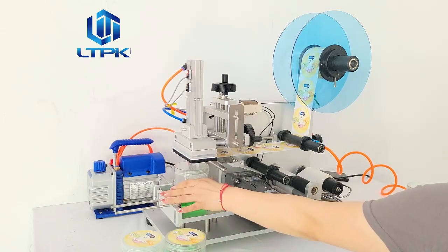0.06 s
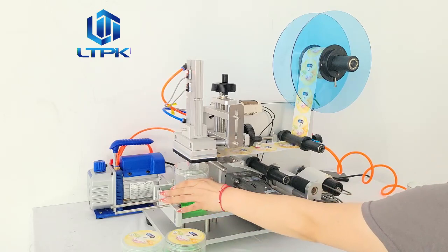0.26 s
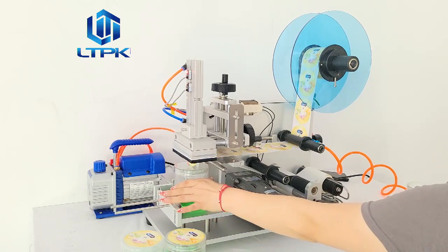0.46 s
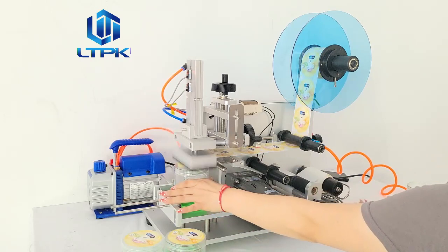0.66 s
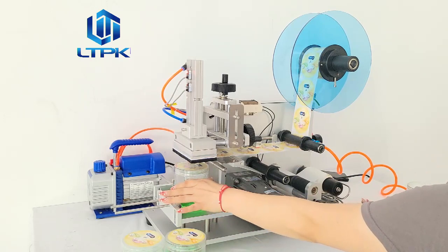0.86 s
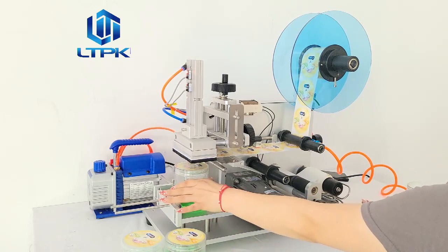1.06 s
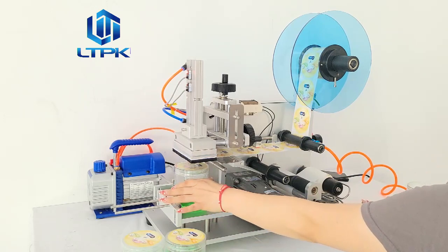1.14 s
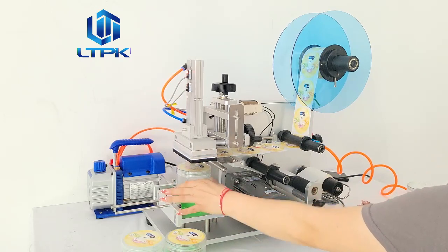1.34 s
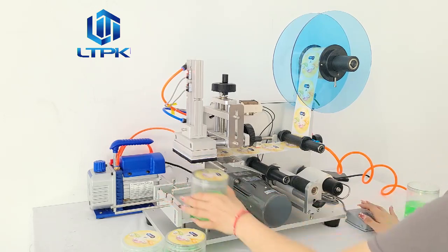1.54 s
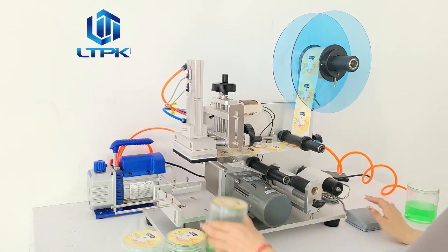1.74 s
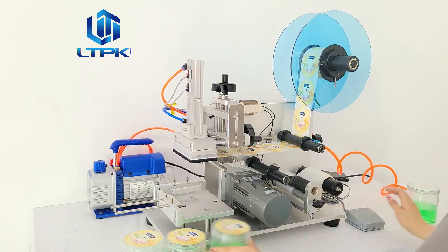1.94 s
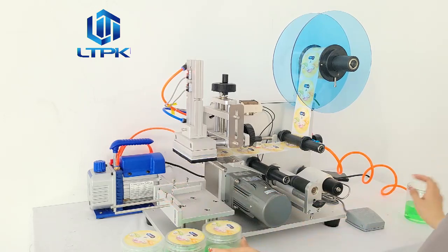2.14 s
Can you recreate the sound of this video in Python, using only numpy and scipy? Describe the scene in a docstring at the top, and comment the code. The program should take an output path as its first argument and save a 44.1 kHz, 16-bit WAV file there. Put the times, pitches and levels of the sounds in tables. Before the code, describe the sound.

An air-powered labeling machine hisses loudly, then clacks, before a jar knocks on a table.

```python
"""An air-powered labeller runs one cycle on a table in a small bare room.
A switch blips, the valve snaps over and air hisses as the cylinder presses a label onto a jar.
The valve snaps back, the cylinder empties and the piston clacks into its top stop, ringing the frame.
The jar rubs softly as it slides off its seat, then knocks and rocks as it is set on the table.
All the while a small vacuum pump puffs away."""
import sys
import numpy as np
from scipy import signal
from scipy.fft import rfft, irfft
from scipy.io import wavfile
from scipy.ndimage import uniform_filter1d

SR = 44100
rng = np.random.default_rng(int(sys.argv[2]) if len(sys.argv) > 2 else 0)


def put_to_file(sound):
    """Save the sound as 16-bit audio at rate SR, in the file named by the first command-line argument."""
    columns = np.atleast_2d(sound).T  # one column per channel
    safe = np.clip(columns, -1, 1)
    whole_steps = np.round(safe * 32767)
    wavfile.write(sys.argv[1], SR, whole_steps.astype(np.int16))


N = 97020
T = np.arange(N) / SR


def from_db(db):
    """Turn decibels into a number to multiply by."""
    return 10 ** (np.asarray(db) / 20)


def rms_one(x):
    """Scale a sound so that its average strength (rms) is 1."""
    return x / np.sqrt(np.mean(x ** 2) + 1e-20)


def cut(x, hz, kind, order=2):
    """Keep the "low" or the "high" side of hz; a higher order cuts more sharply."""
    return signal.sosfilt(signal.butter(order, hz, kind, fs=SR, output="sos"), x + 1e-18)


def colour(x, points):
    """Make some pitches louder and others softer, following (f/Hz, level/dB) points."""
    hz, db = np.transpose(points)
    f = np.maximum(np.fft.rfftfreq(N, 1 / SR), 1)
    return irfft(rfft(x) * from_db(np.interp(np.log(f), np.log(hz), db)), N)


def noise(points):
    """Steady noise of strength 1 with the given tone colour."""
    return rms_one(colour(rng.standard_normal(N), points))


def burst(start, decay):
    """A level that jumps to 1 at the start time and dies away."""
    return (T >= start) * np.exp(-np.maximum(T - start, 0) / decay)


def ring(drive, hz, t60):
    """One ringing note: a click sets it off and it fades by 60 dB in its ring time, t60."""
    r, w = from_db(-60 / (t60 * SR)), 2 * np.pi * hz / SR
    return signal.lfilter([.5, 0, -.5], [1, -2 * r * np.cos(w), r * r], drive + 1e-18)


def clicks(times, db):
    """Single clicks at the given times and levels."""
    out = np.zeros(N)
    np.add.at(out, np.clip((times * SR).astype(int), 0, N - 1), from_db(db))
    return out


HUM_HZ, HUM_DB = 100, -62.5
# tone colour of the pump's hiss: f/Hz, level/dB
PUMP_COLOUR = [(60, -35.5), (300, -27), (780, -15.5), (1100, -14.5), (1800, -10.5), (2130, -8.5),
               (2850, -5), (3300, -14), (6000, -19), (9000, -13.5), (11500, -6), (13300, 4), (15500, -0.5)]
# a noise suppressor's gain on the steady pump hiss, lower in the quiet stretch: t/s, level/dB
SUPPRESSOR_GAIN = [(0, -46.5), (.21, -43), (1.0, -47), (1.33, -55), (1.47, -57), (2.035, -57.5),
                   (2.05, -47.5), (2.2, -47)]
# how the hum rises and falls around HUM_DB: t/s, level/dB
HUM_LOUDNESS = [(0, -17), (.12, -20.5), (.17, -28), (.3, -8), (1.08, 6.5), (1.2, -34.5), (2.2, -37)]

def pump(turn_s=.04192, first_s=.0318, puff_db=9, weak_db=-4.5, spread_db=1.2, split_hz=11000):
    """Each turn gives a strong and a weak puff that ring the housing, over a leak and the motor's hum."""
    count = np.arange(-1, int(2 * N / SR / turn_s))
    times = first_s + count * turn_s / 2
    db = puff_db + weak_db * (count % 2) + spread_db * rng.standard_normal(len(count))
    echoes = clicks(times + .012, db - 16)  # a small one follows each puff
    shape = burst(0, decay=.0048) * (1 - burst(0, decay=.0005))  # quick rise, slower fall
    puffs = signal.fftconvolve(clicks(times, db) + echoes, shape / shape.max())[:N]
    # the puffs stand out above split_hz; below it the steady leak counts for more
    bright_leak, dull_leak = from_db(-7), from_db(-0.5)
    bright = np.hypot(puffs, bright_leak) * cut(noise(PUMP_COLOUR), split_hz, "high", order=4)
    dull = np.hypot(from_db(-4.5) * puffs, dull_leak) * cut(noise(PUMP_COLOUR), split_hz, "low", order=4)
    taps = clicks(times + .002, db=-5 + spread_db * rng.standard_normal(len(times)))
    housing = ring(taps, hz=2110, t60=0.031)
    hum_level = from_db(HUM_DB + np.interp(T, *np.transpose(HUM_LOUDNESS)))
    hum = hum_level * np.sin(2 * np.pi * HUM_HZ * T)
    suppressor = from_db(np.interp(T, *np.transpose(SUPPRESSOR_GAIN)))
    return suppressor * (bright + dull + housing) + hum


# clicks of the switch and the opening valve: t/s, level/dB
VALVE_CLICKS = [(.143, -49.5), (.153, -45), (0.226, -39.5), (0.239, -28)]
# notes of the valve body: f/Hz, level/dB, ring time/s
VALVE_NOTES = [(960, -3.5, 0.21), (1044, 8.5, 0.087), (1050, -24, 0.15)]
# first spits of air through the valve: t/s, level/dB, decay/s
AIR_SPITS = [(.2265, -21, 0.019), (.2364, -12.5, 0.0073), (.249, -20.5, 0.011)]
# tone colour of the spits: f/Hz, level/dB
SPIT_COLOUR = [(2500, -13.5), (4400, -21.5), (5100, 0.5), (5900, -9), (7300, -5.5), (8500, -5.5),
               (10000, 3), (11200, 2.5), (12500, -5.5), (14700, 6), (16000, -10)]

def valve():
    """Clicks set the valve body ringing near 1 kHz, and the first air spits through the gap."""
    times, db = np.transpose(VALVE_CLICKS)
    body = sum(ring(clicks(times, db + level), hz, t60) for hz, level, t60 in VALVE_NOTES)
    spit_level = sum(from_db(level) * burst(start, decay) for start, level, decay in AIR_SPITS)
    spits = spit_level * noise(SPIT_COLOUR)
    return cut(cut(body, 2000, "low") + spits, 800, "high", order=4)


AIR_ON_S, AIR_RISE_S, AIR_OFF_S, AIR_FALL_DB_PER_S, AIR_DB = 0.2295, 0.027, 0.8194, 601.5, -11
VENT_S, VENT_RISE_S, VENT_DB = .857, .012, -7.5
# tone colour of the rushing air: f/Hz, level/dB
AIR_COLOUR = [(24, -76), (40, -39), (96, -42.5), (214, -35), (693, -30.5), (805, -27), (1030, -21.5),
              (1230, -26), (1500, -17), (2140, -41.5), (3190, -24), (4640, -26), (6580, -20), (7280, -20),
              (12900, 3), (14700, 4.5), (15800, -26.5)]
# whistles of the exhaust port: f/Hz, width/Hz, level/dB
PORT_WHISTLES = [(13310, 150, -9.5), (14600, 660, -9)]
# faint left-right shimmer of audio coding, heard during the hiss: f/Hz, level against the hiss/dB
CODING_SHIMMER = [(3000, -51.5), (4500, -14.5), (7000, -7.5), (10000, -28), (12500, -38), (14000, -45)]

def air_hiss(split_hz=8500, wash_rise_s=0.16, flutter_db=.5, flutter_hz=25):
    """Air jets through the open valve, then the cylinder empties in a puff. Returns hiss and shimmer."""
    opening = np.clip((T - AIR_ON_S) / AIR_RISE_S, 0, 1)
    flow = opening * from_db(AIR_DB - AIR_FALL_DB_PER_S * np.maximum(T - AIR_OFF_S, 0))
    vent = from_db(VENT_DB) * np.clip((T - VENT_S) / VENT_RISE_S, 0, 1) * burst(VENT_S, decay=0.013)
    flutter = rms_one(cut(rng.standard_normal(N), flutter_hz, "low"))
    level = (flow + vent) * from_db(flutter_db * flutter)
    # the lower wash builds more slowly than the bright jet
    swell = np.clip((T - AIR_ON_S) / wash_rise_s, 0, 1)
    wash = swell * cut(noise(AIR_COLOUR), split_hz, "low", order=6)
    whistles = sum(from_db(db) * rms_one(ring(rng.standard_normal(N), hz, np.log(1000) / (np.pi * width)))
                   for hz, width, db in PORT_WHISTLES)
    jet = cut(noise(AIR_COLOUR) + whistles, split_hz, "high", order=6)
    return level * (jet + wash), level * colour(noise(AIR_COLOUR), CODING_SHIMMER)


# blows on the machine: t/s, thud level/dB, frame level/dB, crack level/dB, decay/s, rise/s
MACHINE_BLOWS = [(0.246, -61, -24, -46.5, 0.0036, 0.00095), (0.2522, -65, -16, -34.5, 0.004, 0.00057),
                 (0.262, -62, -21.5, -53, 0.0031, 0.00036), (0.769, -34, -40, -60.5, 0.03, .008),
                 (0.787, -40, -33, -51.5, 0.075, 0.0015), (0.857, -43, -19.5, -20.5, 0.017, 0.0014),
                 (0.8754, -31, -16, -39.5, 0.0021, 0.0019), (0.88, -20.5, -16, -21, 0.0077, 0.0011),
                 (0.969, -23, -21.5, -8, 0.0029, 0.00055), (0.975, -25.5, -29.5, -32, .024, 0.0037),
                 (1.019, -52, -33, -48, 0.0028, 0.00024)]
# notes of the steel frame: f/Hz, level/dB, ring time/s
FRAME_NOTES = [(712.3, -12.5, 0.18), (988, -6.5, 0.07), (1280, -0.5, 0.079), (1388, -3.5, 0.11),
               (1525, 3, 0.014), (1705, 3.5, 0.049), (1899, -5, 0.041), (2187, -15, 0.04),
               (2966, -15.5, .04)]
# tone colour of a dull thud, also used for the jar's rubs and scuffs: f/Hz, level/dB
THUD_COLOUR = [(40, -34), (100, -9), (170, -8.5), (270, 4.5), (350, -5.5), (430, -3.5), (600, -2),
               (900, 0.5), (1500, -21.5), (3000, -28)]
# tone colour of a sharp metal crack: f/Hz, level/dB
CRACK_COLOUR = [(500, -19), (2400, -11.5), (3150, 8.5), (3700, -0.5), (4350, -0.5), (5000, -4.5), (6400, 1),
                (7800, -5.5), (9500, 3.5), (10500, -7.5), (12000, -7.5), (16000, -8.5)]

def machine_clacks():
    """Each blow is a short rattle made of a low thud, the ringing steel frame and a bright crack."""
    thud_level, rings, crack_level = 0, 0, 0
    for start, thud_db, frame_db, crack_db, decay, rise in MACHINE_BLOWS:
        rattle = burst(start, decay) * np.clip((T - start) / rise, 0, 1)
        frame = sum(from_db(db) * rms_one(ring(rattle * rng.standard_normal(N), hz, t60))
                    for hz, db, t60 in FRAME_NOTES)
        loudest = np.sqrt(uniform_filter1d(frame ** 2, size=256).max())
        rings += from_db(frame_db) * frame / loudest
        thud_level += from_db(thud_db) * rattle
        crack_level += from_db(crack_db) * rattle
    rings = cut(cut(rings, 700, "high", order=4), 3800, "low")
    thuds = cut(thud_level * noise(THUD_COLOUR), 130, "high")
    return thuds + rings + crack_level * noise(CRACK_COLOUR)


# rubs of the jar on its seat: t/s, half length/s, level/dB, friction compared with the note/dB
JAR_RUBS = [(1.681, .025, -64, -6), (1.788, .02, -60.5, -20)]

def jar_slide():
    """The jar slides off its seat: soft rubs swell and fade on its main note, with some friction noise."""
    note = ring(rng.standard_normal(N), hz=330, t60=0.11)
    hollow = rms_one(cut(note, 500, "low"))
    friction = cut(noise(THUD_COLOUR), 400, "high")
    return sum(from_db(db) * np.exp(-((T - middle) / half) ** 2) * (hollow + from_db(rough_db) * friction)
               for middle, half, db, rough_db in JAR_RUBS)


# bumps of the jar on the table: t/s, level/dB, extra for the upper notes and scuff/dB
JAR_BUMPS = [(2.0446, -33.5, -12), (2.0565, -28.5, -9), (2.0655, -26.5, -20), (2.0742, -39, 12),
             (2.0875, -31, 0), (2.098, -29.5, -2.5), (2.112, -40, -9), (2.126, -46, 8), (2.151, -40, 0),
             (2.173, -43, -1)]
# notes of the jar on the table top: f/Hz, level/dB, ring time/s
JAR_NOTES = [(101.5, -21, 0.42), (181, -16.5, 0.079), (280, -11, 0.11), (329.5, -0.5, 0.11),
             (382, -14, 0.087), (503.4, -12, 0.41), (599, -27, 0.27), (816, -13, 0.08)]

def jar_knocks(upper_hz=450, scuff_db=-11.5):
    """The jar knocks and rocks on its base; touches of the rim bring out its upper notes."""
    times, db, extra_db = np.transpose(JAR_BUMPS)
    rings = sum(ring(clicks(times, db + level + extra_db * (hz > upper_hz)), hz, t60)
                for hz, level, t60 in JAR_NOTES)
    scuff_level = sum(from_db(level + scuff_db) * burst(start, decay=0.0059)
                      for start, level in zip(times, db + extra_db))
    knocks = rings + scuff_level * noise(THUD_COLOUR)
    return cut(cut(knocks, 700, "low", order=4), 90, "high")


# echo of the small bare room: f/Hz, ring time/s, level/dB
ROOM_ECHO = [(101, 0.23, -0.5), (300, 0.53, -7), (806, .65, -8.5), (1520, 0.81, -11.5), (3200, .6, -8.5),
             (6000, 0.66, -8.5), (9140, 0.33, -6.5), (10900, .32, -20), (15000, 0.66, -20.5)]

def room(x, gap_s=0.0081):
    """The walls send back a blur of echoes; each band of pitch has its own level and ring time."""
    hz, t60, db = np.transpose(ROOM_ECHO)
    f, white, tail = np.fft.rfftfreq(N, 1 / SR), rfft(rng.standard_normal(N)), 0
    edges = np.geomspace(40, 18000, 15)
    for low, high in zip(edges, edges[1:]):
        length, level = (np.interp(np.log(low * high) / 2, np.log(hz), column) for column in (t60, db))
        band = irfft(white * (f >= low) * (f < high), N)
        fade = burst(gap_s, length / np.log(1000))
        tail += from_db(level) * band * fade / np.linalg.norm(fade)
    return signal.fftconvolve(x, tail)[:N]


def scene(air_echo_db=0.5, jar_echo_db=-1.5):
    """Add up the sounds in the centre; only the faint coding shimmer differs between left and right."""
    clacks = machine_clacks() + valve()
    knocks = jar_knocks()
    hiss, shimmer = air_hiss()
    echo = room(clacks + from_db(air_echo_db) * hiss + from_db(jar_echo_db) * knocks)
    centre = pump() + clacks + hiss + jar_slide() + knocks + echo
    return centre + shimmer * np.array([[1], [-1]])


def record(dry, ceiling=1.55, cutoff_hz=15750):
    """Round off the loudest peaks and remove the very highest treble."""
    rounded = ceiling * np.tanh(dry / ceiling)
    return signal.sosfilt(signal.ellip(12, .1, 90, cutoff_hz, fs=SR, output="sos"), rounded)


dry = scene()
out = record(dry)
put_to_file(out)
```